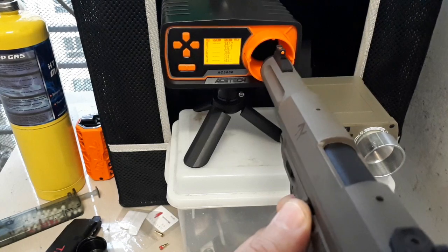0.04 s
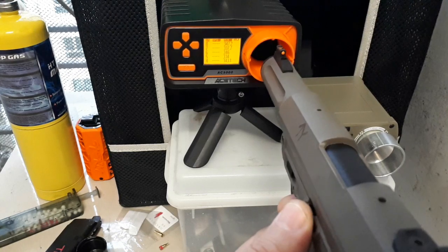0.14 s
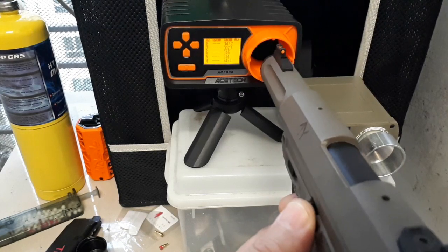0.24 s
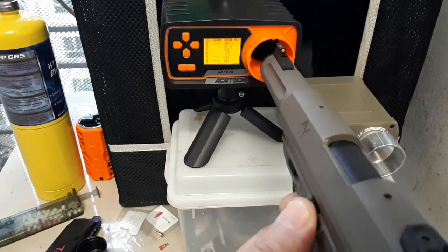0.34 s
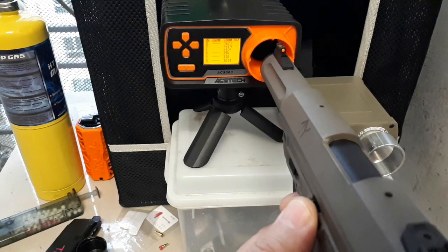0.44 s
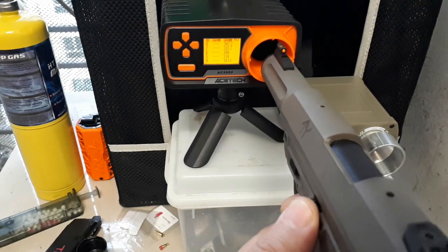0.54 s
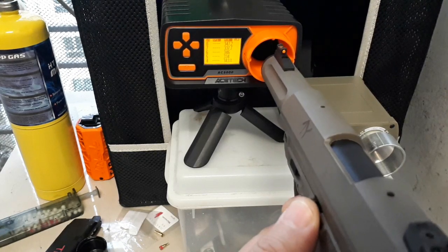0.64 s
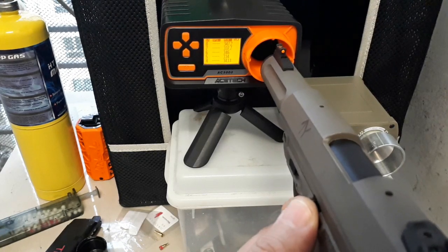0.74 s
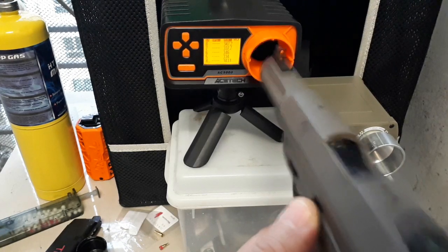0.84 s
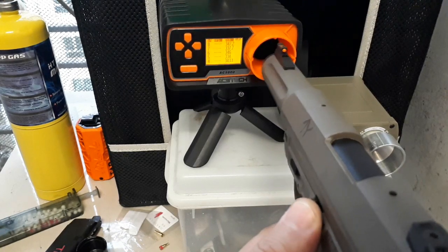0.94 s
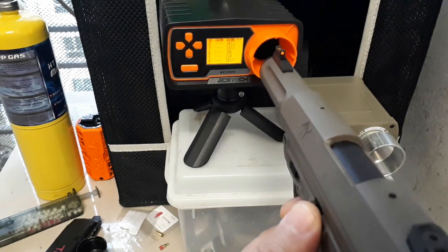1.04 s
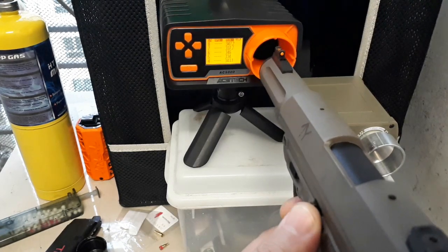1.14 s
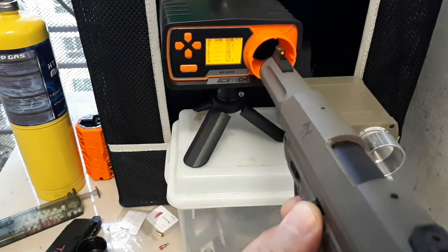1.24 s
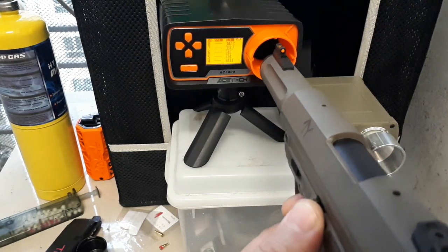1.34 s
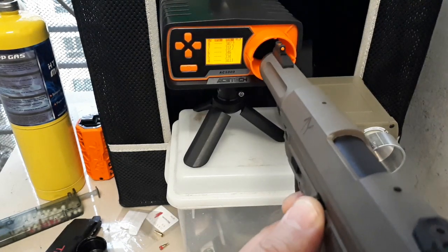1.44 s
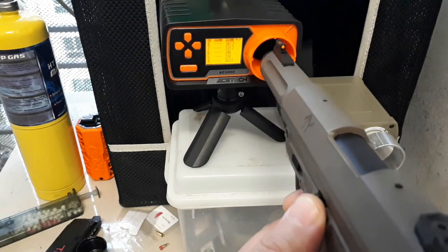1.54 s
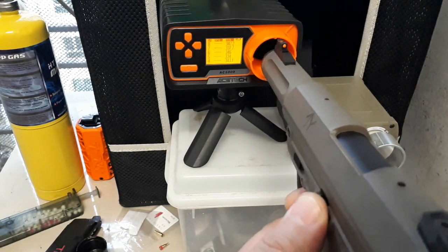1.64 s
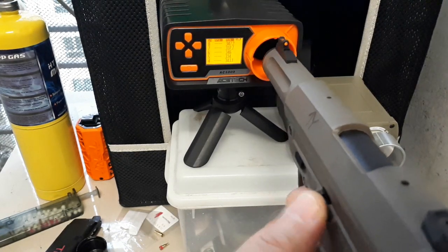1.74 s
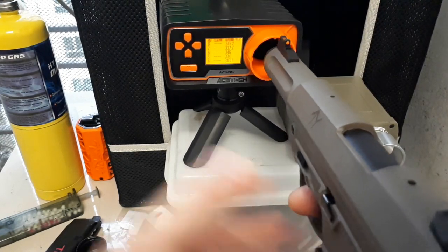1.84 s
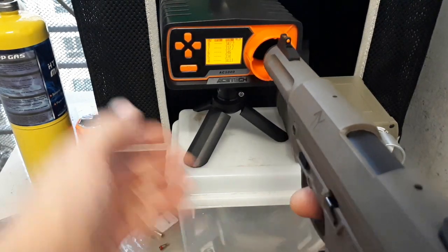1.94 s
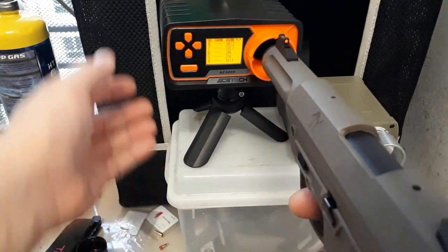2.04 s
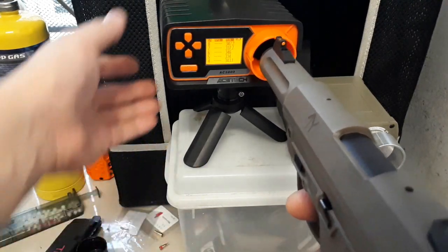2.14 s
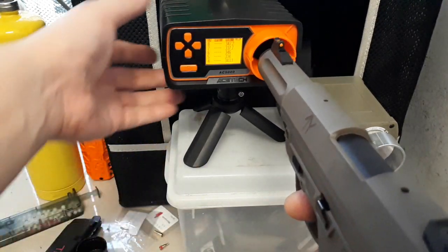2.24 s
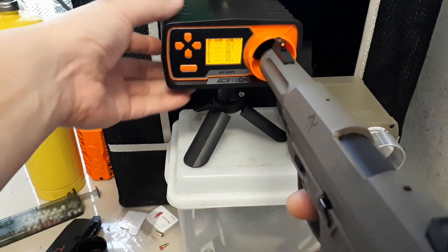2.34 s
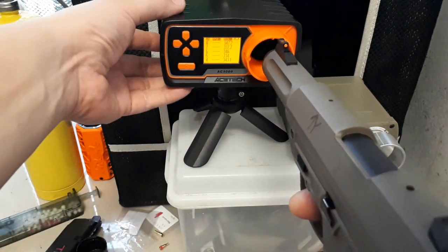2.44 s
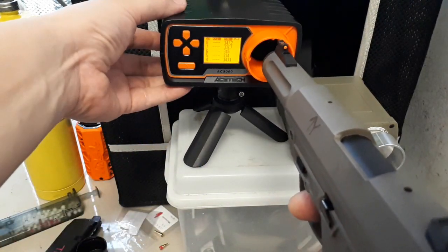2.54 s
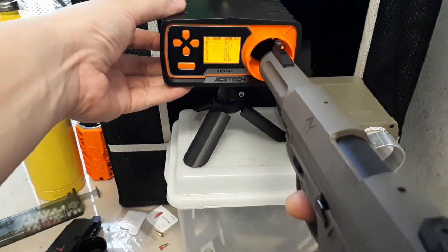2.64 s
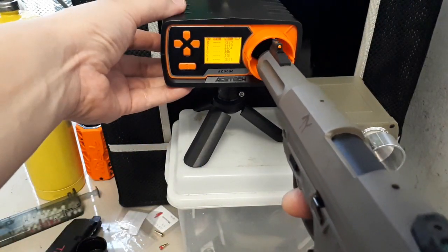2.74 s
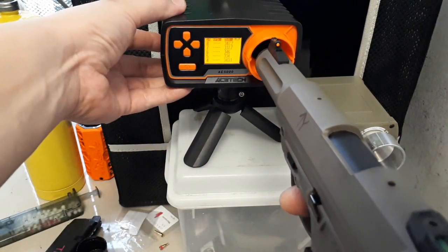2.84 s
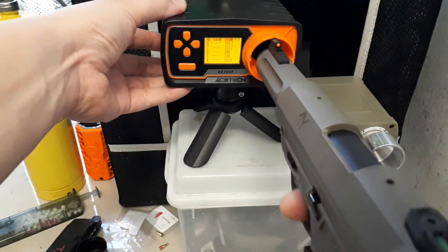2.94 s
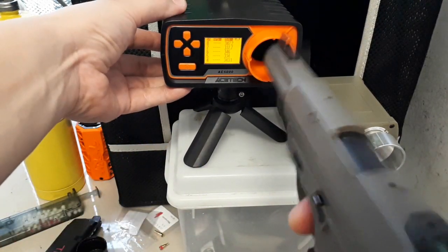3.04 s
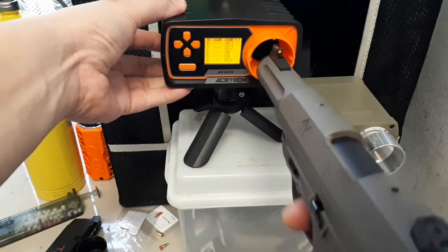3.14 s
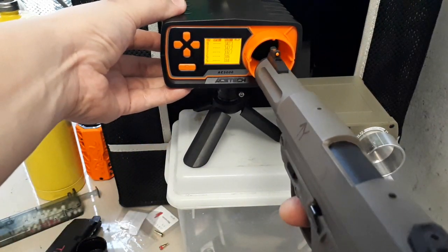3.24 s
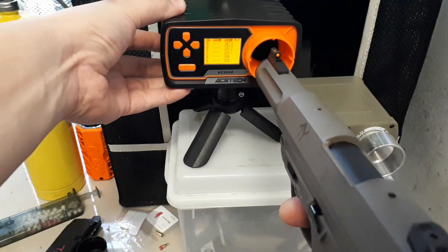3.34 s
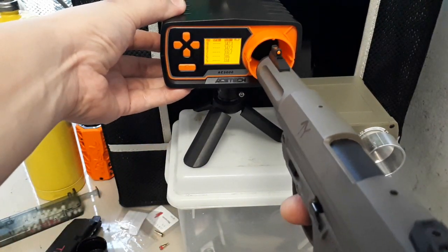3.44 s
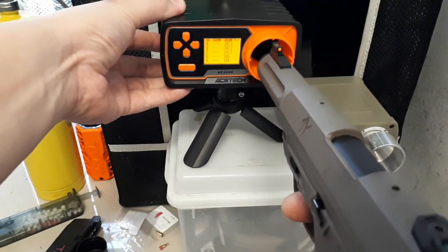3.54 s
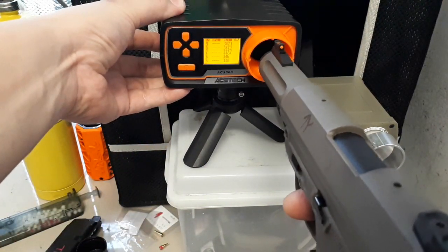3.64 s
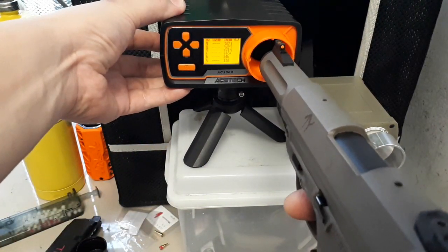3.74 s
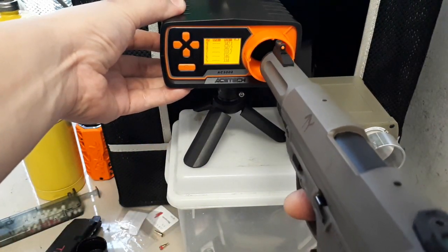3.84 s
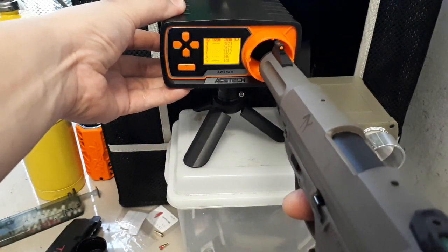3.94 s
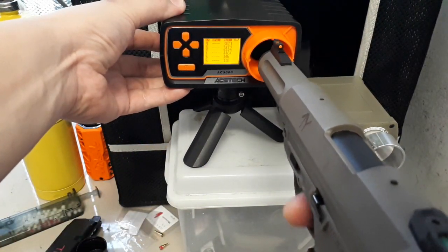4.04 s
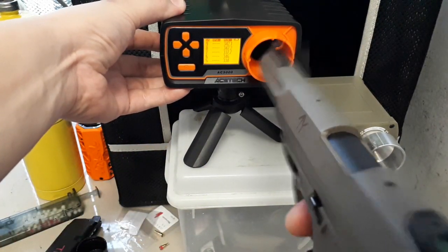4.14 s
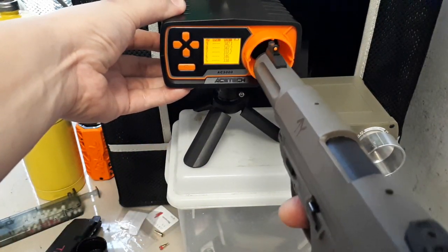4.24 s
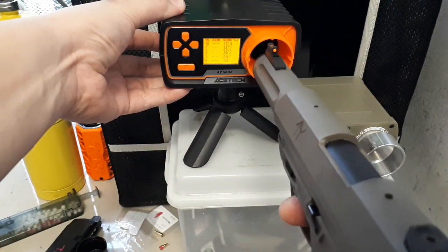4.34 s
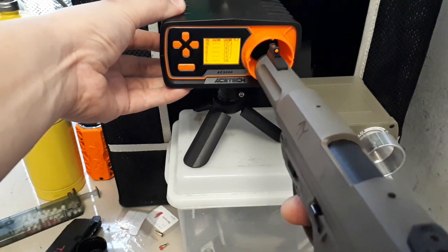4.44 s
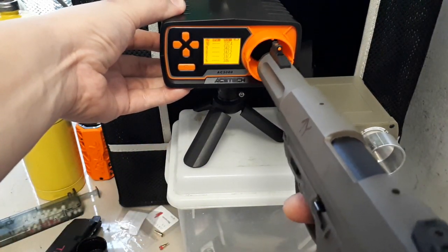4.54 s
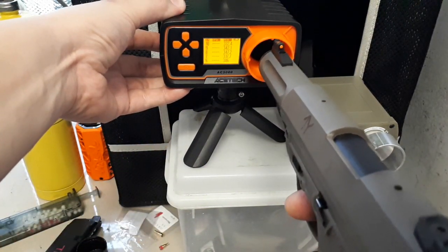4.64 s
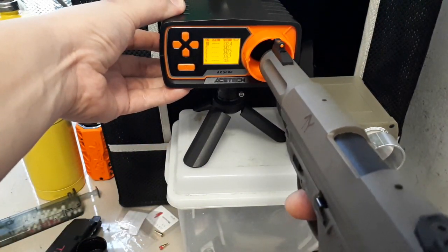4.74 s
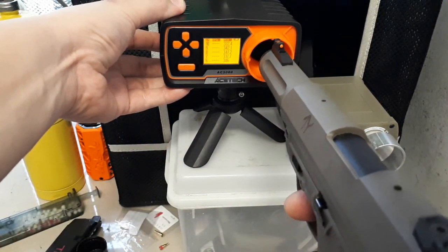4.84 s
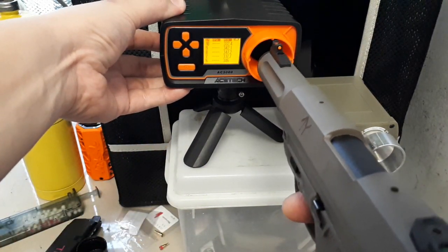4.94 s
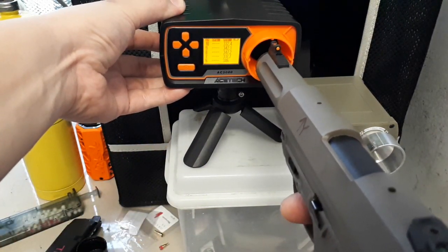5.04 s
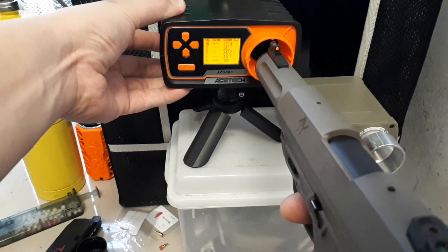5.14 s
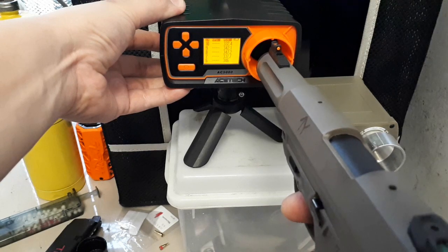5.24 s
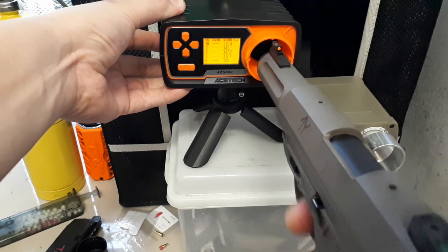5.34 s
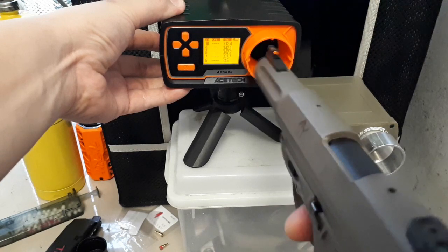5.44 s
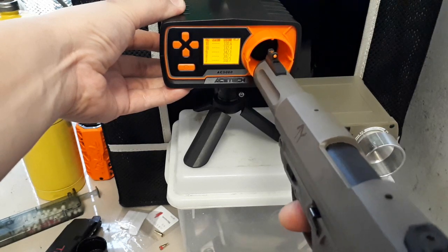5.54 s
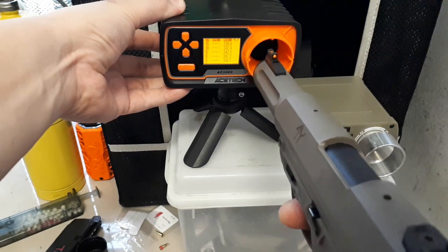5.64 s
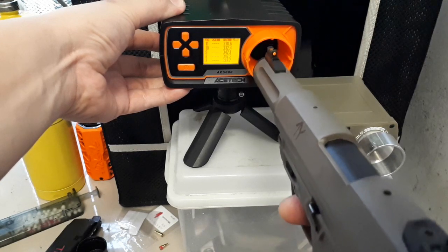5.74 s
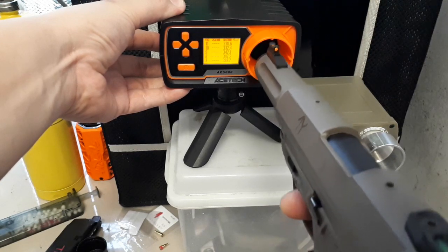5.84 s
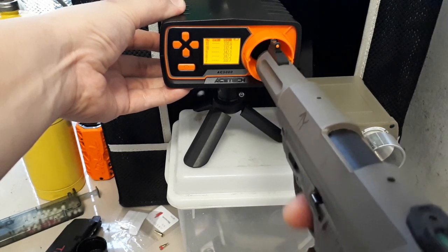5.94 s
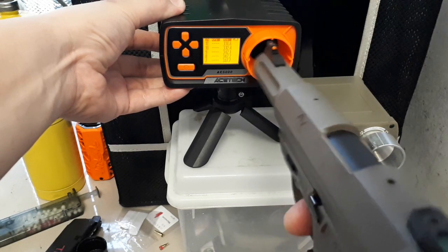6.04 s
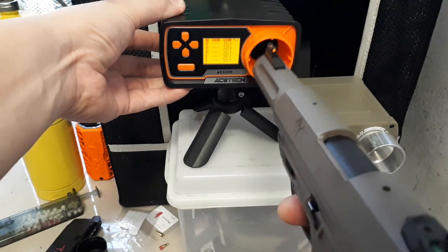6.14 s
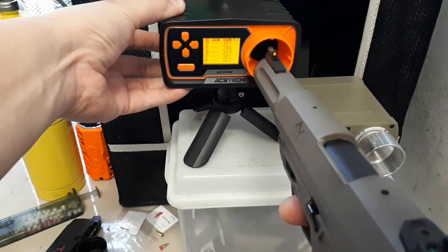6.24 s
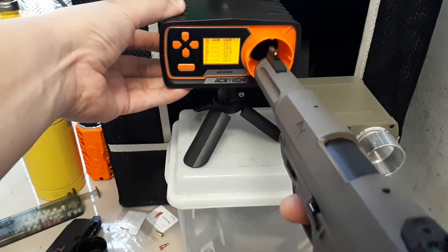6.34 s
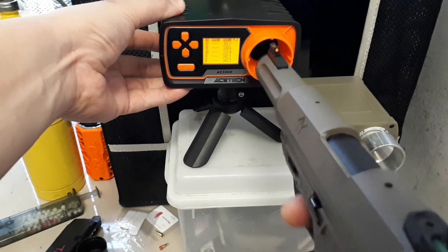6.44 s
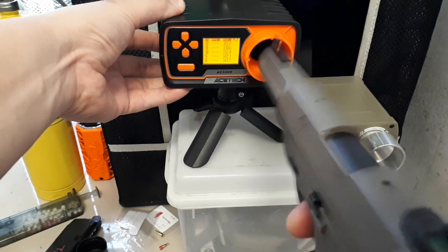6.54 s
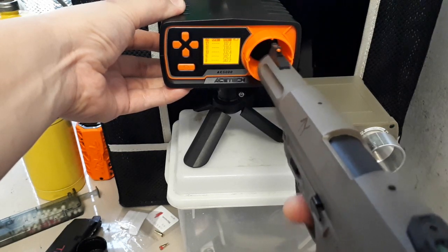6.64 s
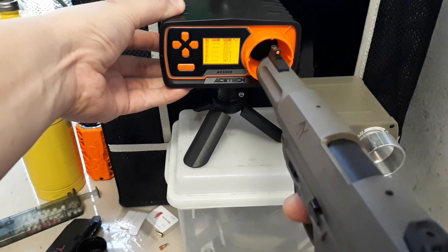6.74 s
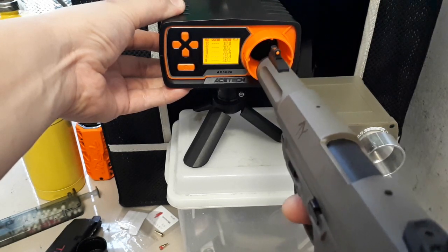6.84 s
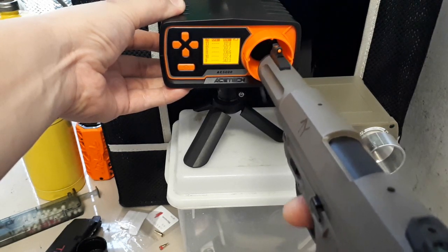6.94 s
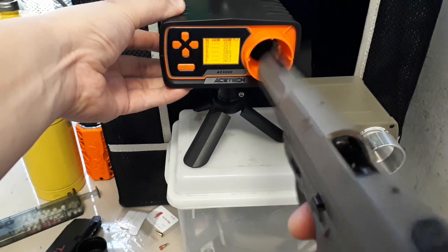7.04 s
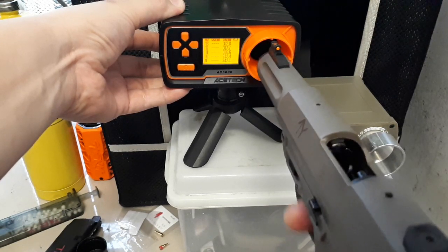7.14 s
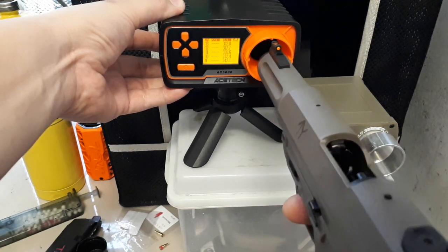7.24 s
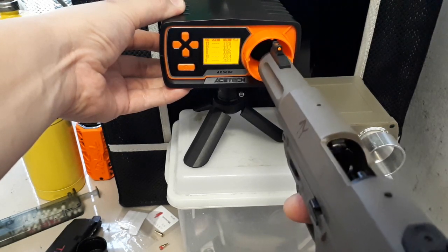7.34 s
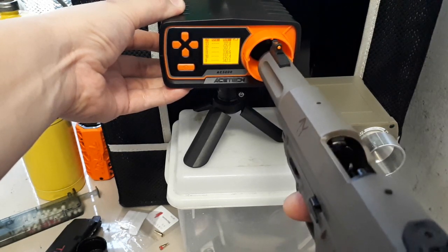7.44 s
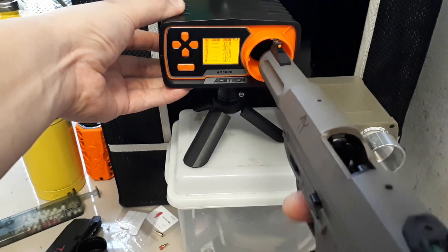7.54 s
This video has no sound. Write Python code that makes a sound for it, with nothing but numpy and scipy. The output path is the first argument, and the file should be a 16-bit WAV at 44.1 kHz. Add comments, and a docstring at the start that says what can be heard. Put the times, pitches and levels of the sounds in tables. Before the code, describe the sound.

A gas-powered toy pistol fires seven shots close to the microphone in a small fabric booth. Each is a sharp crack of gas with a snap of the slide, a small pellet tick and a faint metallic ring. One shot comes first, then a pause, then six more that come closer together toward the end. The trigger clicks softly back after each. A low ventilation rumble runs underneath.

```python
"""First comes a low ventilation rumble and a faint ring of steel in a small fabric booth.
Then a gas blowback toy pistol fires seven shots, close to a camera. Each shot is a blast of gas,
with a slide that slams shut about 40 ms later (it locks open on the last). The pellet strikes,
the springs shiver, and between shots the trigger clicks back. The camera's gain control lifts
the room tone in long pauses, and its limiter flattens the shot that follows."""
import sys
import numpy as np
from scipy import signal
from scipy.fft import rfft, irfft, next_fast_len
from scipy.io import wavfile
from scipy.ndimage import uniform_filter1d, minimum_filter1d

SR = 44100
rng = np.random.default_rng(int(sys.argv[2]) if len(sys.argv) > 2 else 0)


def master_out(mix):
    """Clip the mix to full scale and print it as 16-bit PCM to the path in sys.argv[1]."""
    frames = np.transpose(np.atleast_2d(mix))
    ceiling = np.clip(frames, -1, 1)
    pcm = np.round(ceiling * 32767).astype(np.int16)
    wavfile.write(sys.argv[1], SR, pcm)


N = 335601
TIME = np.arange(N) / SR
AGE = np.arange(SR * 3 // 4) / SR  # seconds since one short sound began

# The shots. Each row: start in seconds, recoil level in dB, seconds until the pellet strikes.
SHOTS = [(0.918, -1, .135), (3.085, -3.5, .141), (4.161, -3, .1305), (5.436, -5, .1275), (6.0435, -1, .122),
         (6.5725, -4.5, .1185), (7.0955, -8, .1235)]
# The finger lets go and the trigger resets. Each row: start in seconds, level in dB.
TRIGGER_RESETS = [(1.361, -28.5), (3.558, -30.5), (4.653, -28), (5.925, -30), (7.042, -28.5), (7.59, -30)]
# The colour of each noise, from bass to treble. Each row: frequency in Hz, level in dB.
ROOM_COLOUR = [(15, -53), (25, -18), (46, -8.5), (86, -7), (141, 0), (174, -5), (243, -6.5), (331, -14.5),
               (440, -15), (527, -23.5), (718, -19.5), (1170, -23.5), (2680, -32.5), (4860, -51),
               (12000, -57.5), (15600, -93), (22000, -120)]
BLAST_COLOUR = [(24, -59.5), (40, -28), (140, -12.5), (180, -6.5), (444, -5.5), (491, -8), (570, -6.5),
                (965, -6.5), (1070, -4.5), (2000, -4.5), (3140, -8), (5440, -16.5), (9450, -21),
                (12100, -18), (16000, -23.5)]
SPRING_COLOUR = [(100, -25.5), (500, -13), (1300, -5), (2900, -5.5), (4200, -13), (8000, -19.5),
                 (16000, -30)]
TRIGGER_COLOUR = [(150, -18.5), (600, -14.5), (1000, -3), (2200, -3), (3400, -1), (5000, -9.5), (7500, -9),
                  (10000, -15), (12500, -12.5), (16000, -19.5)]
SLAM_COLOUR = [(150, -24.5), (700, -13.5), (1800, 1.5), (3100, 2.5), (4500, -15.5), (8000, -13.5),
               (16000, -23)]
PELLET_COLOUR = [(150, -25.5), (600, -3.5), (1050, -1.5), (1500, 6.5), (2400, -11), (3600, -5),
                 (4800, -13.5), (7000, -9.5), (8200, -5.5), (9600, -10.5), (12000, 0.5), (16000, -8.5)]
# Tones that stand out of a noise. Each row: frequency in Hz, width in Hz, strength in dB.
OPENING_PEAKS = [(1696, 9, 19), (800, 150, 6), (3400, 700, 4), (3962, 20, 13), (7000, 1500, 4)]  # the steel at the very start
GUN_PEAKS = [(280, 50, -2), (742, 25, 0), (851, 35, 0), (996, 30, -1), (1320, 110, -4), (1960, 100, -5),
             (2205, 35, -3), (2790, 70, -4), (2960, 110, -3), (3250, 80, -4), (12200, 1800, -4)]  # barrel, slide and frame
STEEL_PEAKS = [(1630, 42, 3), (2650, 33, 2), (2800, 66, 1), (4000, 35, 9)]  # the steel after a shot
# Ringing tones. Each row: frequency in Hz, level in dB, seconds to fade by 60 dB (called t60).
BOOTH_TONES = [(145, 0, .42), (247, -5, .25), (323, -12, .35), (446, -8, .28), (571, -8, .12),
               (619, -12, .28)]  # standing waves between the walls
SLIDE_TONES = [(802, -5, 0.2), (991, 0, 0.14), (1281, -3, 0.2), (1362, -3, 0.19), (1820, -6, 0.24),
               (1895, -1, 0.15), (2051, 0, 0.14), (2239, -5, 0.19), (2509, -7, 0.24), (2665, -5, 0.19),
               (2756, -2, 0.16), (2961, -8, 0.23), (3009, -6, 0.2), (3058, -1, 0.14), (3165, -3, 0.17),
               (3241, -4, 0.18), (4059, -10, 0.16), (4334, -11, 0.16), (4974, -15, 0.17), (6573, -13, 0.15),
               (7892, -16, 0.16), (8387, -16, 0.16)]
# How long a noise lingers. Each row: frequency in Hz, seconds to fade by 60 dB.
BOOTH_DECAY = [(60, .14), (150, .33), (400, .29), (1200, .25), (3000, .255), (6000, .225), (10000, .2),
               (16000, .165)]
STEEL_DECAY = [(500, 3.2), (1700, 4.3), (3800, 1.7), (7000, 1.6), (14000, .7)]
# How alike left and right sound. Each row: frequency in Hz, likeness (1 is the same, 0 unrelated).
ROOM_LIKENESS = [(60, 0.99), (130, 1), (290, 0.92), (640, 0.78), (1400, 0), (3100, 0), (7000, 0.21),
                 (15000, 0.13)]
GUN_LIKENESS = [(60, .3), (150, .5), (280, .6), (500, .35), (800, .25), (1200, -.1), (2200, .2), (5500, .1),
                (9000, .55), (15000, .65)]


def amp(db):
    """Turn decibels into a multiplier."""
    return 10 ** (np.asarray(db) / 20)


def look_up(table, hz):
    """Read between the rows of a table, on a logarithmic frequency scale."""
    freqs, values = np.transpose(table)
    return np.interp(np.log(hz + 1), np.log(freqs), values)


def fade(t, t60):
    """Silent before t = 0, then 60 dB down every t60 seconds."""
    return (t >= 0) * np.exp(-np.log(1000) * np.abs(t) / t60)


def filtered(x, response):
    """Scale each frequency in x by response(hz)."""
    n = x.shape[-1]
    padded = next_fast_len(n + 8192)
    return irfft(rfft(x, padded) * response(np.fft.rfftfreq(padded, 1 / SR)), padded)[..., :n]


def noise(colour, likeness=GUN_LIKENESS, size=len(AGE), peaks=()):
    """Stereo noise with an average (rms) level of 1, shaped by a colour and peaks."""
    def response(hz):
        turn = np.arccos(np.clip(look_up(likeness, hz), -1, 1)) / 2
        power = 1 + sum(amp(db) ** 2 * 4 / (1 + (2 * (hz - f) / width) ** 2) for f, width, db in peaks)
        return amp(look_up(colour, hz)) * np.sqrt(power) * np.array([np.cos(turn), np.sin(turn)])
    mid, side = filtered(rng.standard_normal((2, size)), response)
    stereo = np.array([mid + side, mid - side])
    return stereo / np.sqrt(np.mean(stereo ** 2) + 1e-20)


def die_away(x, decay=BOOTH_DECAY):
    """Make steady noise fade like an echo, each frequency at its own speed."""
    hz, t, spectrum = signal.stft(x, SR, nperseg=256)
    faded = spectrum * fade(t, look_up(decay, hz)[:, None])
    return signal.istft(faded, SR, nperseg=256)[1][:, :x.shape[1]]


def ring(tones, scatter_db, spread):
    """Fading tones at slightly random strengths, with left and right out of step."""
    out = np.zeros((2, len(AGE)))
    for hz, db, t60 in tones:
        strength, step = rng.standard_normal(2)
        phase = rng.uniform(0, 2 * np.pi) + spread * step * np.array([[1], [-1]])
        out += amp(db + scatter_db * strength) * fade(AGE, t60) * np.sin(2 * np.pi * hz * AGE + phase)
    return out


def contact(colour, likeness, t60, echo_db, attack_s):
    """Two hard things meet: a short crack and the booth's echo."""
    crack = fade(AGE, t60) * noise(colour, likeness)
    echo = amp(echo_db) * die_away(noise(colour))
    return (crack + echo) * (1 - np.exp(-AGE / attack_s))


def add(track, start, sound):
    """Mix a sound in at a start time in seconds."""
    i = max(round(start * SR), 0)
    track[:, i:i + sound.shape[1]] += sound[:, :max(N - i, 0)]


def room_tone(rumble_db=-56, hum_db=-63, hum_hz=120, hiss_db=-93):
    """Low ventilation rumble, a mains hum and the microphones' own hiss."""
    rumble = amp(rumble_db) * noise(ROOM_COLOUR, ROOM_LIKENESS, size=N, peaks=[(780, 130, -2)])
    hum = amp(hum_db) * np.sin(2 * np.pi * hum_hz * TIME)
    hiss = amp(hiss_db) * rng.standard_normal((2, N))
    return rumble + hum + hiss


def opening_ring(echo_db=-47, boom_db=-46, shimmer_db=-60):
    """The booth and the steel are ringing faintly as the scene opens."""
    out = np.zeros((2, N))
    boom_hz, _, boom_t60 = BOOTH_TONES[0]
    boom = fade(AGE, boom_t60) * np.sin(2 * np.pi * boom_hz * AGE)
    echo = die_away(noise(BLAST_COLOUR))
    shimmer = die_away(noise(SPRING_COLOUR, size=2 * SR, peaks=OPENING_PEAKS), STEEL_DECAY)
    add(out, 0, amp(echo_db) * echo + amp(boom_db) * boom)
    add(out, 0, amp(shimmer_db) * shimmer)
    return out


def trigger_clicks(lead_s=.036, pull_db=-52, settle_s=.0067, settle_db=-14):
    """On each soft pull and louder reset, the trigger bar snaps over, then settles on its stop."""
    out = np.zeros((2, N))
    pulls = [(start - lead_s, pull_db) for start, *_ in SHOTS]
    for start, db in pulls + list(TRIGGER_RESETS):
        for delay, step_db in [(0, 0), (settle_s, settle_db)]:
            click = contact(TRIGGER_COLOUR, GUN_LIKENESS, t60=.02, echo_db=-17.5, attack_s=.0011)
            add(out, start + delay, amp(db + step_db) * click)
    return out


def recoil(onset_s, thump_hz=270, knock_hz=110, travel_s=.0031, right_lag_s=.0026):
    """The gun kicks with a low thump, then the slide knocks on its rear stop."""
    thump = ring([(thump_hz, -10, .06)], scatter_db=.5, spread=.95)
    since_knock = AGE - onset_s - travel_s - np.array([[0], [right_lag_s]])
    swell = fade(since_knock, .05) * (1 - np.exp(-np.abs(since_knock) / .006))
    knock = amp(-9) * swell * np.sin(2 * np.pi * knock_hz * since_knock)
    return thump + knock


def gas_blasts(shot_db=2.5, treble_db=5.5, onset_s=.007):
    """The valve sends the same charge of gas through the barrel each time; slide and booth ring on."""
    out = np.zeros((2, N))
    valve = (1 + np.tanh((AGE - onset_s) / .0023)) / 2  # half open at onset_s
    # Gun and booth stay put, so part of the echo is the same for every shot.
    same_echo = die_away(noise(BLAST_COLOUR, peaks=GUN_PEAKS))
    for start, recoil_db, _ in SHOTS:
        jet = amp(-8) * fade(AGE, t60=.14) * noise(BLAST_COLOUR, peaks=GUN_PEAKS + [(870, 700, -2)])
        fresh_echo = die_away(noise(BLAST_COLOUR, peaks=GUN_PEAKS))
        echo = amp(-15) * (same_echo + fresh_echo) / np.sqrt(2)
        gas = filtered(jet + echo, lambda hz: amp(treble_db * hz / (hz + 4000)))
        kick = amp(recoil_db) * recoil(onset_s)
        slide = amp(-23) * ring(SLIDE_TONES, scatter_db=3, spread=.8)
        booth = amp(-27) * ring(BOOTH_TONES, scatter_db=2.65, spread=.55)
        booth *= 1 - np.exp(-AGE / .019)  # takes a moment to build up
        add(out, start - onset_s, amp(shot_db) * valve * (gas + kick + slide + booth))
    return out


def spring_shiver(level_db=-59):
    """The springs and steel parts keep shivering faintly after each shot."""
    out = np.zeros((2, N))
    for start, *_ in SHOTS:
        shimmer = die_away(noise(SPRING_COLOUR, size=2 * SR, peaks=STEEL_PEAKS), STEEL_DECAY)
        add(out, start, amp(level_db) * shimmer)
    return out


def slide_slams(level_db=-7, delay_s=.0372):
    """The slide slams shut after each blast but the last, when the empty magazine holds it open."""
    out = np.zeros((2, N))
    for start, *_ in SHOTS[:-1]:
        slam = contact(SLAM_COLOUR, [(1000, .5)], t60=.009, echo_db=-25, attack_s=.0003)
        add(out, start + delay_s, amp(level_db) * slam)
    return out


def pellet_strikes(level_db=-18):
    """Every pellet strikes equally hard after its short flight."""
    out = np.zeros((2, N))
    for start, _, flight_s in SHOTS:
        strike = contact(PELLET_COLOUR, [(1000, .4), (10000, .8)], t60=.014, echo_db=-22, attack_s=.0006)
        add(out, start + flight_s, amp(level_db) * strike)
    return out


def scene():
    """All the sounds in the booth, added together."""
    pistol = gas_blasts() + slide_slams() + pellet_strikes() + trigger_clicks() + spring_shiver()
    return pistol + opening_ring() + room_tone()


def level(x, seconds):
    """The running average (rms) level of both channels."""
    power = uniform_filter1d(np.mean(x ** 2, axis=0), max(int(seconds * SR), 1))
    return np.sqrt(np.abs(power) + 1e-12)


def gain_control(x, loud_db=-22, wait_s=1.066, ramp_s=.23, boost_db=13.5):
    """The volume creeps up after a quiet spell, and back down at the next loud sound."""
    last_loud = np.maximum.accumulate(np.where(level(x, .01) > amp(loud_db), TIME, 0))
    boosted_s = np.cumsum(TIME - last_loud > wait_s) / SR
    boost_share = (boosted_s - np.interp(TIME - ramp_s, TIME, boosted_s)) / ramp_s
    return x * amp(boost_db * boost_share)


def limiter(x, limit_db=-9.5, window_s=.0032, hold_s=.0057, recovery_db_per_s=480):
    """Sound over the limit is turned down; the volume stays there briefly, then recovers."""
    over_db = np.maximum(20 * np.log10(level(x, window_s)) - limit_db, 0)
    size = 2 * int(hold_s * SR / 2) + 1
    held_db = -minimum_filter1d(-over_db, size, origin=size // 2)
    recovery_db = recovery_db_per_s * TIME
    cut_db = np.maximum.accumulate(held_db + recovery_db) - recovery_db
    limited = x * amp(-cut_db)
    return limited / (1 + limited ** 8) ** (1 / 8)  # rounds off the remaining peaks


def record(dry, low_cut_hz=40, top_hz=16000):
    """The camera cuts the deepest bass, evens out the volume and drops the highest treble."""
    low_cut = signal.butter(2, low_cut_hz, "highpass", fs=SR, output="sos")
    evened = limiter(gain_control(signal.sosfilt(low_cut, dry)))
    return filtered(evened, lambda hz: 1 / (1 + (hz / top_hz) ** 120))


dry = scene()
out = record(dry)
master_out(out)
```